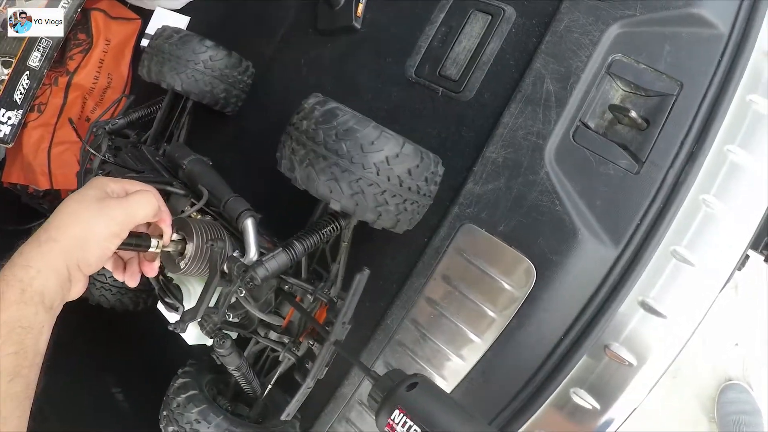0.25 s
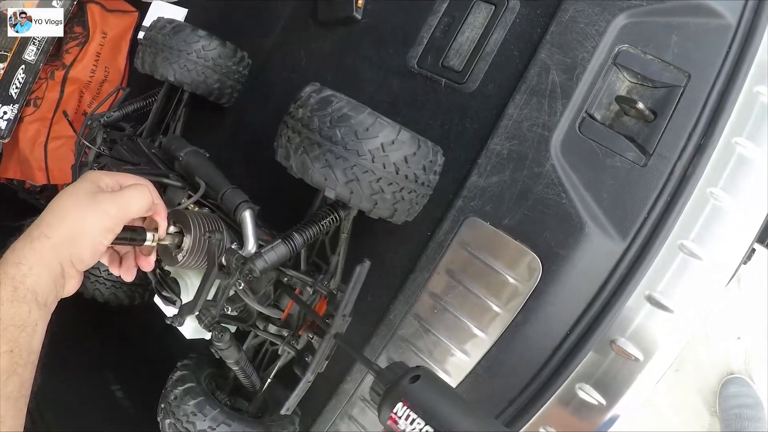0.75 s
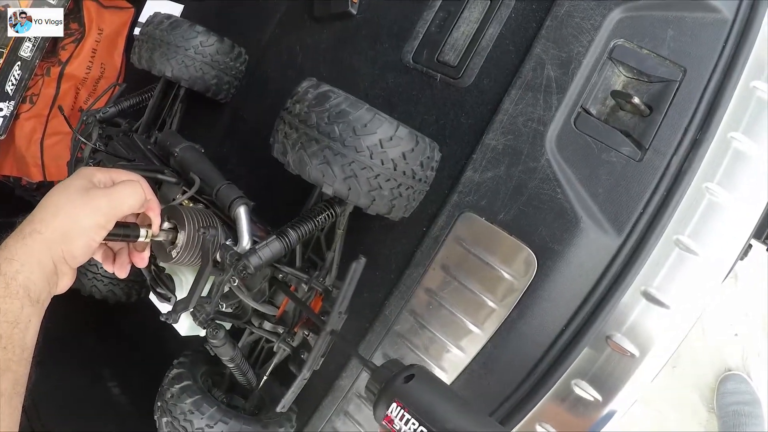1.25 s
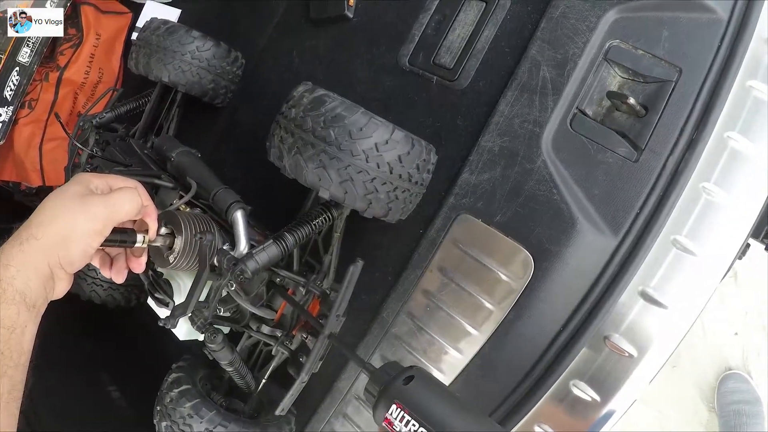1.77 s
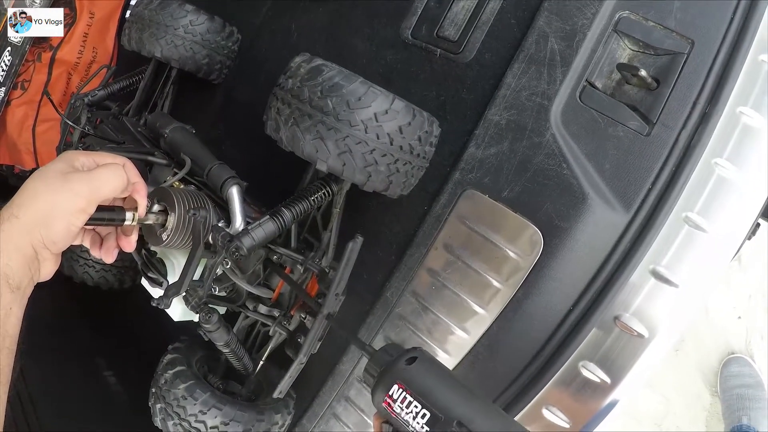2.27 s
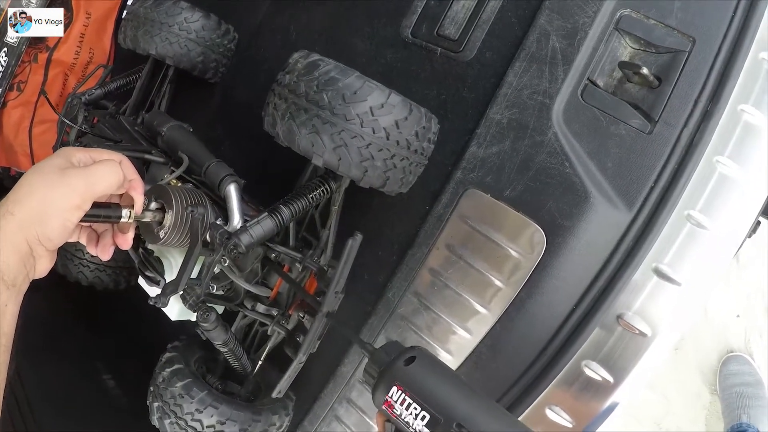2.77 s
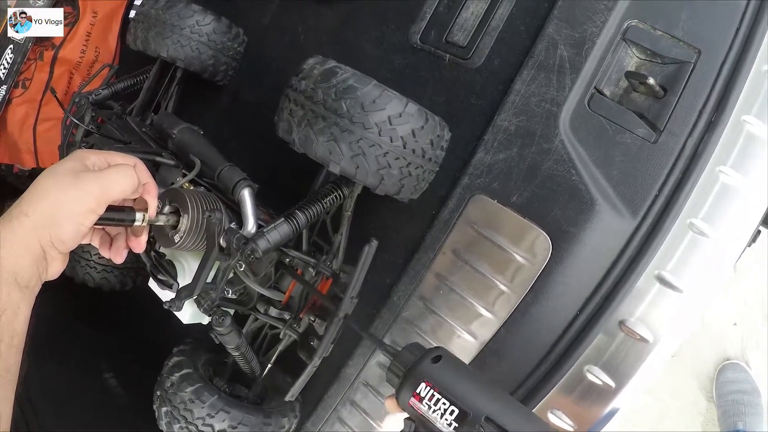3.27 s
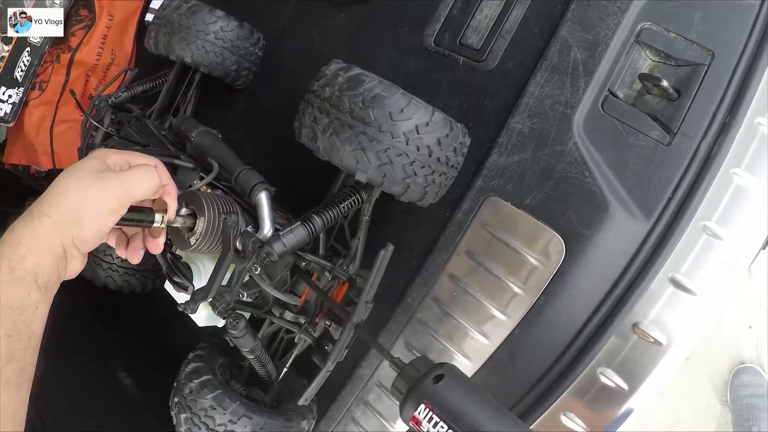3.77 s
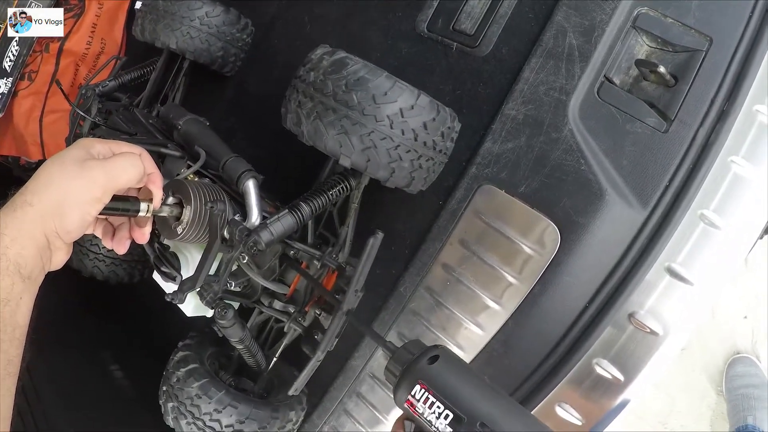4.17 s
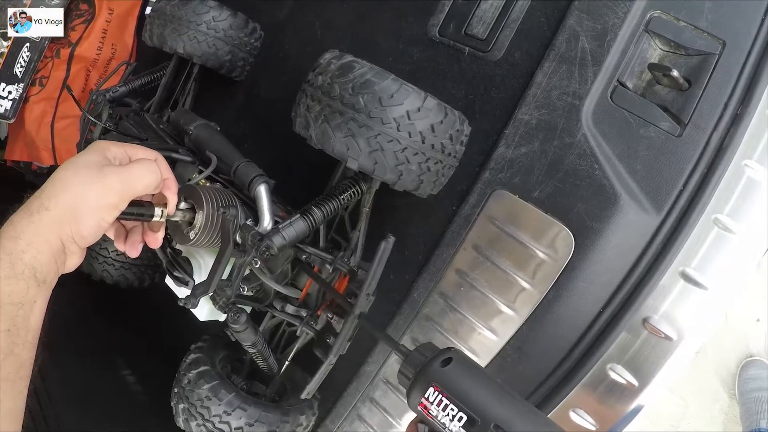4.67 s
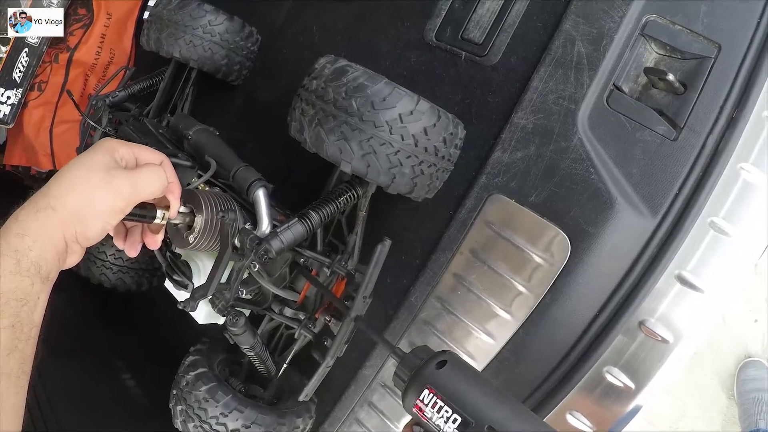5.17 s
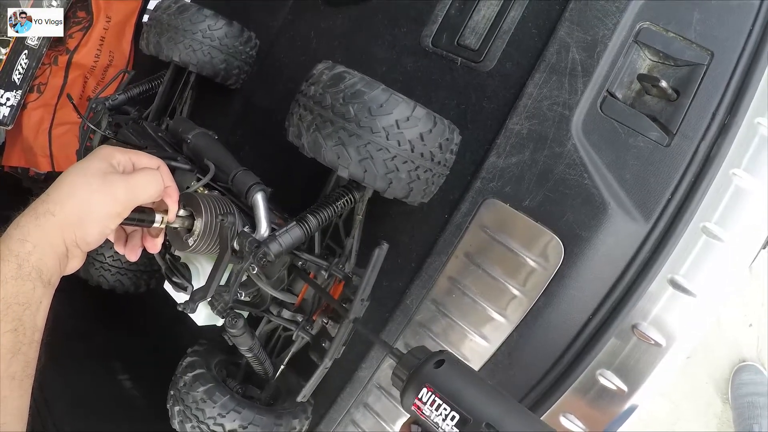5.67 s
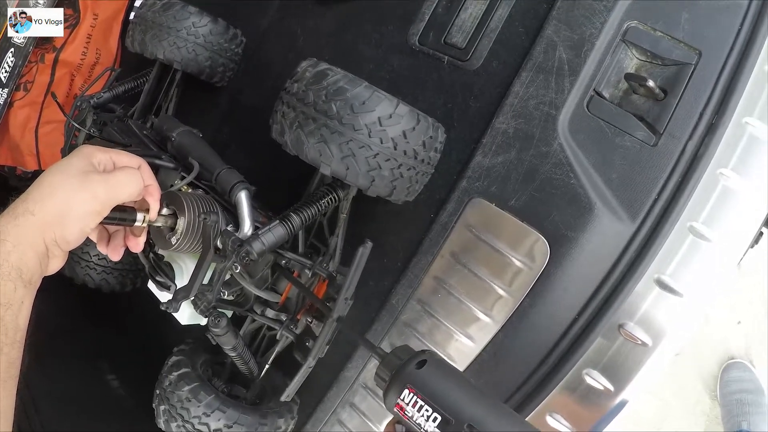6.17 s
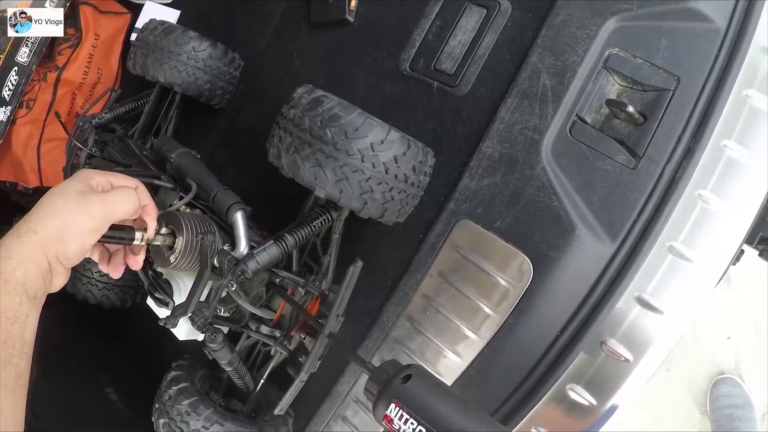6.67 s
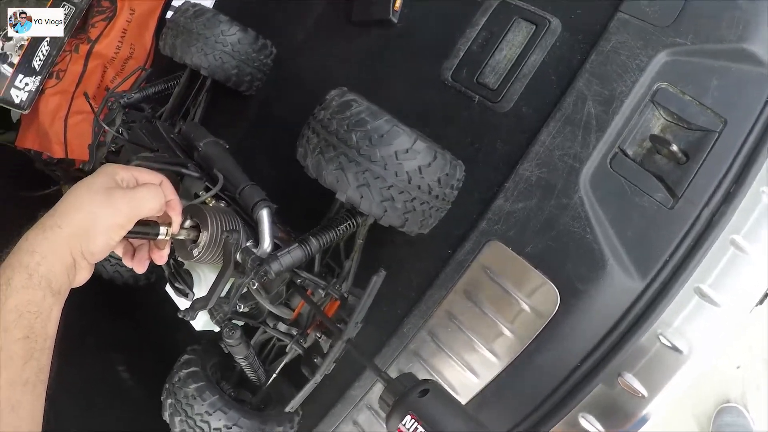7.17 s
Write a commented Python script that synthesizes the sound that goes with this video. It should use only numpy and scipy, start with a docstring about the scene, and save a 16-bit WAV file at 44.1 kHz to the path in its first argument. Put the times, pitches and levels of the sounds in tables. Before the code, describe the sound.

Close up in an open car boot, a model truck's engine is turned over by an electric starter. Grinding, whining gears carry a beat of puffs and hard metal clacks, broken by rasping slips and stray exhaust pops. It stops for about half a second, resumes with a quicker, steadier rhythm, then struggles again and gives a few last pops without starting. A low outdoor rumble lies faintly behind.

```python
"""A rasp, a string of pops and grinding gears: an electric starter cranks the nitro engine of a model
truck in an open car boot, pauses once and tries again. The engine never catches.
Each turn the gears grind up to compression, the pipe puffs and the drive clacks as its slack closes.
Now and then the drive slips with a rasp or the charge fires with a pop.
Behind it: a low outdoor rumble, a faint hum and one far bird."""
import sys
import numpy as np
from scipy import signal
from scipy.fft import rfft, irfft
from scipy.io import wavfile

SR = 44100
rng = np.random.default_rng(int(sys.argv[2]) if len(sys.argv) > 2 else 0)


def bounce(signal):
    """Save signal as a 16-bit WAV file at the path given by the first command-line argument."""
    frames = np.transpose(np.atleast_2d(signal))
    limited = np.clip(frames, -1, 1)
    pcm = np.round(limited * 32767).astype(np.int16)
    wavfile.write(sys.argv[1], SR, pcm)


N = 327663
TIME_S = np.arange(N) / SR

# gear noise spectrum: freq_hz, density_db
GEAR_SPECTRUM = [(150, -8), (450, -16), (650, -10.5), (930, -7), (1300, 5), (1750, -1), (2100, -6.5),
                 (3000, 0.5), (4400, -5.5), (5200, -1.5), (6300, -7.5), (7700, -8.5), (8600, -1.5),
                 (9600, -9.5), (15000, -20)]
# gear case resonances: freq_hz, width_hz, gain_db
CASE_MODES = [(218, 73, -6), (583, 86, 10), (1370, 71, -29), (1793, 48, 4), (2067, 120, 2.5),
              (2960, 28, -22.5), (5060, 390, -5.5)]
# engine outruns the starter after quick firings: start_s
OVERRUNS_S = [.152, .517, 7.243]
# laboured turns: start_s, puff_db, clack_lag_s, clack_db
LABOURED_TURNS = [(.941, -22.5, .053, -14.5), (1.369, -20.5, .0507, -12), (1.81, -21, .0462, -11.5),
                  (2.237, -19.5, .051, -10), (2.492, -20, 0.072, -29), (2.915, -19, 0.048, -9),
                  (3.172, -20, .0727, -19.5), (3.85, -17, .0423, -7.5), (5.51, -18.5, .047, -10),
                  (5.935, -18, .0436, -12.5), (6.198, -19, .0474, -10), (6.462, -18, .043, -12),
                  (6.727, -17, .0372, -14), (6.989, -21, .078, -29.5), (7.379, -22, .031, -14.5)]
# steady cranking: start_s, period_s, turn_count
STEADY_RUN = (4.016, .1548, 9)
# firings of the charge: start_s, knock_db, blow_db
FIRINGS = [(.135, -19.5, -42.5), (0.147, -14, -18), (.330, -14.5, -23), (0.35, -12, -29),
           (0.367, -10.5, -20.5), (.394, -11, -14), (0.418, -15.5, -31.5), (0.437, -15, -22),
           (.457, -12, -21.5), (.484, -13, -15), (0.666, -20.5, -18.5), (1.104, -12.5, -13),
           (1.537, -12.5, -11.5), (1.972, -15.5, -13), (2.643, -27, -13.5), (5.668, -11.5, -13),
           (7.158, -16, -20), (7.172, -6.5, -31), (7.192, -17, -19)]
# exhaust pipe resonances: freq_hz, level_db, t60_s
PIPE_MODES = [(209.7, 1, 0.037), (328.4, -1.5, 0.061), (388.2, -8.5, 0.12), (615.5, 0, 0.048),
              (769, -4, 0.043), (1005, -5, .04), (1137, -4, 0.068), (1497, 5, 0.025), (1509, 13.5, 0.011),
              (1766, -7, 0.068), (2074, -10.5, 0.059), (2300, -18.5, 0.0092)]
# drive rattles after firings: start_s, level_db, first_gap_s, first_loss_db, clack_count
DRIVE_RATTLES = [(0.1508, -1.5, .0308, 10.5, 3), (0.5182, 0, .027, 14, 3), (0.7, -8, .0392, 5, 2),
                 (1.1392, -3.5, 0.037, 3.5, 2), (1.5707, -3.5, .0398, 3, 2), (2.009, -3, 0.045, 5, 2),
                 (2.681, -3, .0464, 4.5, 2), (5.702, -3.5, 0.037, 3.5, 2), (7.215, 1, 0.028, 13.5, 2)]
# one further clack on its own: start_s, level_db
LONE_CLACK = (.8964, -13)
# clack spectrum: freq_hz, density_db
CLACK_SPECTRUM = [(590, -46.5), (1000, -3.5), (1680, 0), (2340, 0), (3040, -3), (3300, -3), (4440, -8.5),
                  (4920, 0), (6050, -11), (8250, -6.5), (11500, -9.5), (14500, -20), (15500, -37.5)]
# engine and chassis resonances: freq_hz, level_db, t60_s
METAL_MODES = [(1697, -4, .027), (2400, -36, 1.1), (3090, -18, .19), (4760, -10, .038), (5040, -10, .059),
               (5440, -36, 1.6), (6740, -28, .3), (7980, -13, .15), (8300, -5.5, .027), (8480, -1, .036),
               (9600, -10, .03), (11180, -15, .05), (12470, -26, .14), (14050, -24, .07)]
# drive slips against compression: start_s, level_db
DRIVE_SLIPS = [(.0287, -3), (.829, -7), (1.2682, -4.8), (1.7012, -4.8), (2.1265, -4.8), (2.395, -7),
               (2.807, -5), (3.0755, -6.8), (5.402, -5.5), (5.825, -5.6), (6.0925, -5.7), (6.3548, -5),
               (6.616, -5.3), (6.891, -5.8)]
# skid spectrum: freq_hz, density_db
SKID_SPECTRUM = [(530, -61.5), (900, -22.5), (1240, -1), (1450, -10.5), (1820, -2.5), (1930, -26),
                 (2120, -7), (2930, 0.5), (3710, -8), (5310, -4), (11900, -14), (15500, -25)]
# chassis shudder spectrum: freq_hz, density_db
SHUDDER_SPECTRUM = [(100, -14), (220, 4), (350, -2), (470, -1), (700, 4), (1000, -10), (1300, -3),
                    (2200, -21.5)]
# outdoor rumble spectrum: freq_hz, density_db
RUMBLE_SPECTRUM = [(12, -40.5), (20, -4), (51, -9.5), (72, -6.5), (115, -12.5), (143, -16.5), (294, -30.5),
                   (2410, -47), (3500, -50), (5380, -41.5), (6360, -51.5), (15000, -59)]
# far bird's chirp: time_s, pitch_hz, level_db
CHIRP_CONTOUR = [(3.565, 4200, -81), (3.585, 5470, -64.5), (3.603, 5400, -66), (3.618, 4800, -63.5),
                 (3.635, 4200, -88), (3.655, 4700, -72), (3.672, 5470, -60), (3.69, 5400, -86)]
# left-right likeness of noise: freq_hz, correlation (clipped to +-1 in use)
MIC_CORRELATION = [(40, -1.3), (200, -2.75), (1200, 0.5), (2500, 0.89), (5000, -0.08), (12000, 0.4)]
# level of left over right: freq_hz, balance_db
MIC_BALANCE = [(40, 21.5), (200, 18), (400, 11.5), (700, 6), (1200, -2.5), (2500, -3), (5000, -1.5),
               (8000, 1), (14000, 0.5)]
# phase of left ahead of right: freq_hz, lead_rad
MIC_PHASE = [(30, -1.1), (260, -1.7), (600, -1.67), (1200, -0.79), (2900, 0.97), (15000, -1.13)]

PUFF_LEAD_S, SLIP_LEAD_S, POP_LEAD_S = .034, .0071, .0101  # compression peaks this long before each
SQUEEZE_S, SAG_S = .024, .042  # half-widths of load and speed dip at compression
FREE_MESH_HZ, SAG_SHARE = 562, .235
GEAR_DB, COAST_DB, COAST_DB_PER_S = -31.5, -9, -43
WHINE_DB, WHINE_IDLE_SHARE = -1.5, .18
OFF_S, REST_S, ON_S = 3.16, 3.41, 3.729  # starter let go, gears stopping, starter on again
BRAKE_S, SETTLE_S, SPIN_UP_S = .025, .05, .028
SLIP_S, SLIP_EASE_DB, SLIP_EASE_S = .011, -6.5, .2
OVERRUN_EASE_DB, OVERRUN_EASE_S = -8, .33
STEADY_PUFF_DB, STEADY_LAG_S, STEADY_CLACK_DB = -16, .0383, -5
PUFF_MID_DB, PUFF_MID_DB_PER_DB = -11.5, 1.62  # stronger puffs are rounder
PORT_DELAY_S = .012  # firing to exhaust port opening
KNOCK_DB, KNOCK_DB_PER_DB, RING_DB = -12, .44, -8  # harder clacks are brighter
RATTLE_GAP_RATIO = 1.72
HUM_HZ, HUM_DB = 76, -53.5
CUTOFF_HZ = 15400


def starter():
    """Gears grind and whine through their case; each compression slows and strains them."""
    compressions_s = ([s - PUFF_LEAD_S for s, *_ in turns()] + [s - SLIP_LEAD_S for s, _ in DRIVE_SLIPS]
                      + [s - POP_LEAD_S for s, *_ in FIRINGS])
    nearest_s = np.min(abs(TIME_S - np.array(compressions_s)[:, None]), axis=0)
    load = np.exp(-(nearest_s / SQUEEZE_S) ** 2)
    sag = SAG_SHARE * np.exp(-(nearest_s / SAG_S) ** 2)
    mesh_cycles = np.cumsum(FREE_MESH_HZ * (1 - sag + .012 * drift(18) + .005 * drift(250))) / SR
    harmonics = enumerate([0, -8, -8, -12, -11], start=3)
    teeth = sum(amp(db) * np.sin(2 * np.pi * k * mesh_cycles) for k, db in harmonics)
    whine = unit(gear_case(teeth)) * amp(2.8 * drift(76))
    whine *= amp(WHINE_DB) * (WHINE_IDLE_SHARE + (1 - WHINE_IDLE_SHARE) * load)
    rattle = unit(amp(.99 * drift(290) + 2.8 * drift(40)))
    grind = unit(gear_case(noise(GEAR_SPECTRUM))) * rattle * (amp(2.5) + amp(-5) * load)
    strain = band(unit(gear_case(noise(GEAR_SPECTRUM))) * rattle, 3400, "low")
    return gear_gain() * (grind + amp(-13) * load * strain + whine)


def gear_case(x):
    """The case adds its resonances to whatever shakes it."""
    return x + sum(amp(db) * signal.lfilter(*signal.iirpeak(hz, hz / width_hz, SR), x)
                   for hz, width_hz, db in CASE_MODES)


def gear_gain():
    """Gear noise holds under power, eases on slips and overruns, and coasts to rest in the pause."""
    slip_db = SLIP_EASE_DB * unloading([s for s, _ in DRIVE_SLIPS], SLIP_EASE_S)
    overrun_db = OVERRUN_EASE_DB * unloading(OVERRUNS_S, OVERRUN_EASE_S)
    since_off_s, since_rest_s, since_on_s = (np.maximum(TIME_S - s, 0) for s in (OFF_S, REST_S, ON_S))
    braking = np.exp(-since_off_s / BRAKE_S)
    powered = braking + 1 - np.exp(-since_on_s / SPIN_UP_S)
    settling = np.exp(-since_rest_s / SETTLE_S)
    coasting = amp(COAST_DB + COAST_DB_PER_S * since_off_s) * (1 - braking) * settling
    return amp(GEAR_DB) * (powered * amp(np.minimum(slip_db, overrun_db)) + coasting)


def unloading(starts_s, length_s):
    """Slack, 0-1: the load drops at each start and returns over length_s."""
    grid_s = TIME_S[::100]
    since_s = np.maximum(grid_s - np.array(starts_s)[:, None], 0)
    slack = (1 - np.exp(-since_s / .014)) * np.exp(-(since_s / length_s) ** 3)
    return np.interp(TIME_S, grid_s, slack.max(0))


def turns():
    """All unfired turns: start_s, puff_db, clack_lag_s, clack_db."""
    start_s, period_s, count = STEADY_RUN
    steady = [(start_s + k * period_s, STEADY_PUFF_DB, STEADY_LAG_S, STEADY_CLACK_DB)
              for k in range(count)]
    return LABOURED_TURNS + steady


def exhaust():
    """Unfired turns puff; a firing knocks, then blows out of the port. The boot echoes the bass once."""
    pulses, hiss, rush, echo = np.zeros((4, N))
    t = TIME_S[:SR // 12]
    for s, db, *_ in turns():
        mid_db = PUFF_MID_DB + PUFF_MID_DB_PER_DB * (STEADY_PUFF_DB - db)
        add(pulses, s, amp(db + 1.5) * pipe(mid_db, crack_db=-21, spread=.012, glide=.16))
        add(rush, s, amp(db - 8) * np.exp(-t / .002))
    for s, knock_db, blow_db in FIRINGS:
        knock = pipe(mid_db=1.8, crack_db=8.05, spread=.014, glide=.41)
        blow = pipe(mid_db=.94, crack_db=-15.5, spread=.06, glide=.17)
        add(pulses, s, amp(knock_db - 9) * knock)
        add(pulses, s + PORT_DELAY_S, amp(blow_db - .5) * blow)
        add(rush, s, amp(knock_db - 14) * np.exp(-t / .014))
        add(hiss, s, amp(knock_db - 8) * (1 - np.exp(-t / .0015)) * np.exp(-t / .015))
    turbulence = unit(signal.fftconvolve(rng.standard_normal(N), pipe(mid_db=4, crack_db=2))[:N])
    direct = pulses + rush * turbulence
    add(echo, .022, amp(-7.5) * band(direct, 610, "low"))
    hiss_spectrum = [(1000, -2), (3000, -5.5), (6400, -9.5), (8500, 1), (11500, -9.5), (15000, -19)]
    return direct + echo + hiss * noise(hiss_spectrum)


def pipe(mid_db, crack_db, spread=0, glide=0):
    """A gas pulse rings the pipe: modes start sharp by glide and sink; low ones build up slowly."""
    t = TIME_S[:SR // 6]
    hz, db, t60_s = np.transpose(PIPE_MODES)[:, :, None]
    db = db + curve([(400, .0067), (620, mid_db), (1200, crack_db)], hz)
    hz = hz * (1 + spread * rng.standard_normal(hz.shape))
    attack = 1 - np.exp(-(t * (hz + 250) / 1.43) ** 2)
    polarity = (-1) ** np.arange(len(hz))[:, None]
    swept_s = np.cumsum(1 + glide * np.exp(-t / .0018)) / SR
    return (polarity * amp(db - 60 * t / t60_s) * attack * np.sin(2 * np.pi * hz * swept_s)).sum(0)


def clacks():
    """Drive slack closes with a hard knock, a brief chatter and a ring of metal."""
    out, t = np.zeros((2, N)), TIME_S[:SR // 2]
    hz, mode_db, t60_s = np.transpose(METAL_MODES)[:, :, None]
    ring = amp(mode_db - 60 * t / t60_s) * (1 - np.exp(-t / .0011))
    impact = (1 - np.exp(-(t / .0022) ** 2)) * (np.exp(-t / .0029) + amp(-14) * np.exp(-t / .01))
    for s, db in clack_events():
        burst = noise(CLACK_SPECTRUM, size=len(t)) * impact
        chatter = band(burst, 4000, "high")
        knock = amp(KNOCK_DB - KNOCK_DB_PER_DB * db) * band(burst, 3500, "low")
        phase_cycles = rng.random((len(hz), 1)) + .11 * rng.random((2, len(hz), 1))
        strike = amp(3.5 * rng.standard_normal((len(hz), 1)))
        metal = (strike * ring * np.sin(2 * np.pi * (hz * t + phase_cycles))).sum(1)
        add(out, s - .0004, amp(db) * (amp(4) * (chatter + knock) + amp(RING_DB) * metal))
    return out


def clack_events():
    """One lone clack, a clack per unfired turn, and rattles that slow and fade: start_s, level_db."""
    events = [LONE_CLACK] + [(s + lag_s, db) for s, _, lag_s, db in turns()]
    for s, db, gap_s, loss_db, count in DRIVE_RATTLES:
        for k in range(count):
            delay_s = gap_s * (RATTLE_GAP_RATIO ** k - 1) / (RATTLE_GAP_RATIO - 1)
            events.append((s + delay_s, db - loss_db * np.sqrt(k)))
    return events


def slips():
    """The drive skids in a burst of tiny catches; the chassis shudders just after."""
    skid, shudder = np.zeros((2, N))
    t = TIME_S[:SR // 8]
    decay = 1 / np.sqrt(1 + (t / SLIP_S) ** 6) + amp(-38) * np.exp(-t / .016)
    envelope = (1 - np.exp(-(t / .0027) ** .83)) * decay
    for s, db in DRIVE_SLIPS:
        add(skid, s - .0005, amp(db) * envelope)
        add(shudder, s + .0055, amp(db) * envelope)
    catches = unit(amp(.32 * drift(600)))
    return amp(-1) * skid * catches * noise(SKID_SPECTRUM) + amp(-17) * shudder * noise(SHUDDER_SPECTRUM)


def boot(x, t60_s=.078, taps_per_s=2000):
    """Short scattered reflections from the carpeted boot."""
    t = TIME_S[:SR // 4]
    taps = rng.standard_normal((2, len(t))) * (rng.random((2, len(t))) < taps_per_s / SR)
    taps *= (t > .003) * amp(-60 * t / t60_s)
    return signal.fftconvolve(x, taps / np.linalg.norm(taps[0]), axes=1)[:, :N]


def bird():
    """One far chirp: a gliding, wavering tone."""
    s, hz, db = np.transpose(CHIRP_CONTOUR)
    pitch_hz = np.interp(TIME_S, s, hz) * (1 + .017 * drift(400))
    envelope = amp(np.interp(TIME_S, s, db)) * (TIME_S > s[0]) * (TIME_S < s[-1])
    return envelope * np.sin(2 * np.pi * np.cumsum(pitch_hz) / SR)


def outdoors():
    """Low rumble and faint hum of the surroundings."""
    hum = amp(HUM_DB) * np.sin(2 * np.pi * HUM_HZ * TIME_S + .49 * drift(3))
    return amp(-46.5) * noise(RUMBLE_SPECTRUM) + hum


def noise(spectrum, size=N):
    """Coloured stereo noise, rms 1; left-right correlation varies with frequency."""
    hz = np.fft.rfftfreq(size, 1 / SR)
    left, independent = rfft(rng.standard_normal((2, size)))
    correlation = np.clip(curve(MIC_CORRELATION, hz), -1, 1)
    right = correlation * left + np.sqrt(1 - correlation ** 2) * independent
    return unit(irfft(np.array([left, right]) * amp(curve(spectrum, hz)), size))


def drift(rate_hz):
    """Random wander below rate_hz, rms 1."""
    hz = np.fft.rfftfreq(N, 1 / SR)
    return unit(irfft(rfft(rng.standard_normal(N)) / (1 + (hz / rate_hz) ** 4), N))


def band(x, hz, kind):
    """Third-order low-pass or high-pass."""
    return signal.sosfilt(signal.butter(3, hz, kind, fs=SR, output="sos"), x)


def curve(points, hz):
    """Table lookup on a log-frequency axis."""
    freq_hz, value = np.transpose(points)
    return np.interp(np.log(hz + 1), np.log(freq_hz + 1), value)


def add(mix, start_s, sound):
    """Mixes sound in at start_s."""
    part = mix[..., max(round(start_s * SR), 0):][..., :sound.shape[-1]]
    part += sound[..., :part.shape[-1]]


def amp(db):
    """Decibels to gain."""
    return 10 ** (np.asarray(db) / 20)


def unit(x):
    """Scales to rms 1."""
    return x / np.sqrt(np.mean(x ** 2) + 1e-20)


def scene():
    """The truck, its reflections and the open air."""
    truck = exhaust() + clacks() + slips() + starter()
    return truck + amp(-14.5) * boot(truck) + bird() + outdoors()


def record(dry):
    """The left microphone takes most of the bass, slightly late; then soft overload and a low-pass."""
    hz = np.fft.rfftfreq(N, 1 / SR)
    balance = amp(curve(MIC_BALANCE, hz))
    response = 2 * np.array([balance, np.exp(-1j * curve(MIC_PHASE, hz))]) / (1 + balance)
    heard = irfft(rfft(dry) * response, N)
    clipped = heard / (1 + heard ** 6) ** (1 / 6)
    lowpass = signal.firwin(255, CUTOFF_HZ, window=("kaiser", 8), fs=SR)
    return signal.oaconvolve(clipped, lowpass[None], "same")


dry = scene()
out = record(dry)
bounce(out)
```